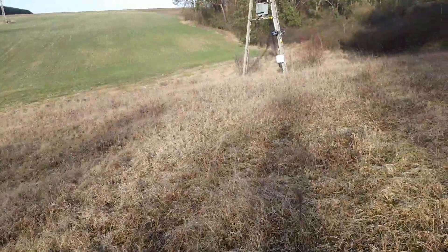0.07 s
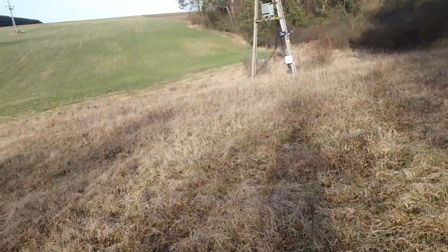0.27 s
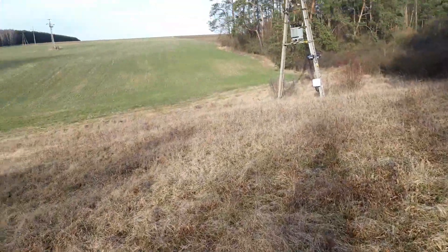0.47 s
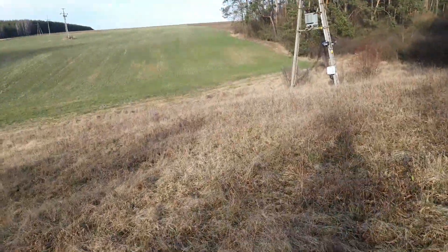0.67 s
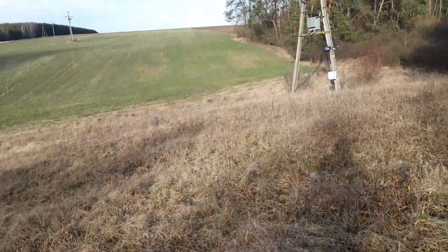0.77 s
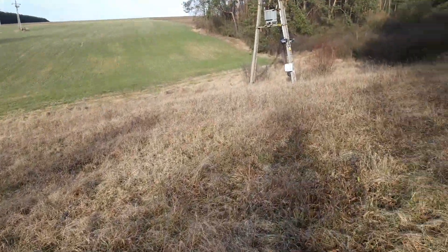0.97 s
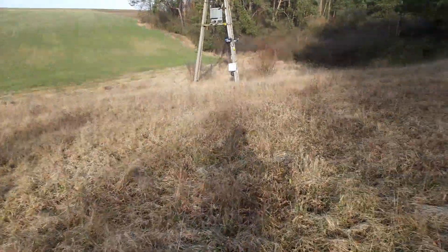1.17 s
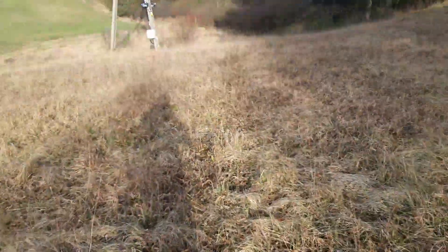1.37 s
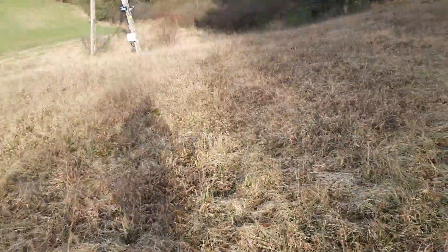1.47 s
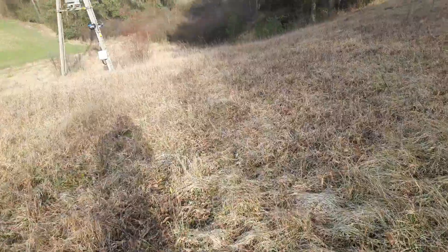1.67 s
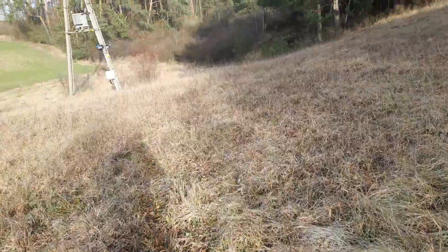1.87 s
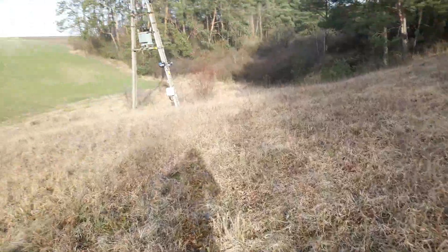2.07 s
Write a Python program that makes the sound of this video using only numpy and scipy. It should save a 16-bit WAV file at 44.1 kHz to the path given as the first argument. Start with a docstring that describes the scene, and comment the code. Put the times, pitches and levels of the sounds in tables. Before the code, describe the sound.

Quick footsteps rustle through tall dry grass while gusty wind rumbles and pops on the microphone

```python
"""Quick steps through tall dry grass in an open meadow, heard from a hand-held microphone.
From the start gusts rumble and flutter on the microphone as turbulence, with sharp pops from single eddies,
over faint air noise. Legs sweep the blades and feet crush the straw in swells of tiny random clicks.
A few stems snap as decaying noise bursts. The wind eases, the crushing grows, and a foot drags at the end."""
import sys
import numpy as np
from scipy import signal
from scipy.fft import rfft, irfft
from scipy.io import wavfile
from scipy.ndimage import uniform_filter1d, map_coordinates

SR = 44100
rng = np.random.default_rng(int(sys.argv[2]) if len(sys.argv) > 2 else 0)


def master(y):
    """Save y as 16-bit WAV."""
    cut = np.clip(np.atleast_2d(y).T, -1, 1)
    pcm = np.round(cut * 32767)  # scale
    wavfile.write(sys.argv[1], SR, pcm.astype(np.int16))


N = 93447

# dry straw underfoot, crushed or scuffed: mean clicks per second, spread of their strength in dB
STRAW_PER_S, STRAW_SPREAD_DB = 9000, 2.5


def undb(db):
    """Amplitude ratio: 20 dB is a factor of ten."""
    return 10 ** (np.asarray(db) / 20)


def curve(rows):
    """Linear interpolation of rows (seconds, value), with corners rounded by a 5 ms moving mean."""
    seconds, values = np.array(rows).T
    joined = np.interp(np.arange(N) / SR, seconds, values)
    return uniform_filter1d(joined, int(0.005 * SR))


def unit(x):
    """Normalisation of the signal power: the rms becomes 1."""
    return x / np.sqrt(np.mean(x ** 2))


def colour(x, points):
    """Zero-phase spectral shaping by (Hz, dB) points, joined by straight lines over log frequency."""
    hz, db = np.array(points, float).T
    f = np.maximum(np.arange(len(x) // 2 + 1) * SR / len(x), 1)
    gain = undb(np.interp(np.log(f), np.log(hz), db))
    return irfft(rfft(x) * gain, len(x))


def walk(hz):
    """Low-passed Gaussian noise: a random course of rms 1 that changes about hz times a second."""
    lowpass = signal.butter(2, hz / 2, fs=SR, output="sos")
    return unit(signal.sosfilt(lowpass, rng.standard_normal(N)))


def even(x, seconds):
    """Division by the local rms: the short-term level stays near 1."""
    k = max(int(seconds * SR), 1)
    power = uniform_filter1d(uniform_filter1d(x ** 2, k), k)
    return x / np.sqrt(power + 1e-12)


def wind():
    """Turbulent pressure: large eddies rumble, fine ones flutter, and both darken as the gust slackens."""
    # Gusts. Each row: time in seconds, rumble level in dB, fine flutter level in dB, both before trim.
    gusts = np.array([(0.0, -10.5, -29.5), (0.025, -20.5, -21.5), (0.041, -21, -44), (0.08, -21, -37),
                      (0.122, -26.5, -43.5), (0.14, -21, -42), (0.202, -22, -34), (0.218, -27, -64),
                      (0.253, -16, -19), (0.291, -31, -69), (0.308, -19, -22), (0.369, -21.5, -41),
                      (0.4, -22, -28), (0.45, -29, -49), (0.489, -42, -56), (0.535, -31, -50),
                      (0.56, -16, -16), (0.58, -19.5, -70), (0.596, -16, -22.5), (0.631, -15, -26.5),
                      (0.68, -22, -29.5), (0.74, -19, -26.5), (0.8, -30, -50.5), (0.82, -24, -34),
                      (0.839, -35, -56), (0.88, -29, -44), (0.9, -37, -52), (0.95, -20, -27.5),
                      (1.002, -18, -39), (1.03, -27.5, -49.5), (1.043, -17.5, -25.5), (1.11, -31, -50),
                      (1.14, -45.5, -62), (1.18, -44, -50.5), (1.195, -22.5, -29.5), (1.24, -34, -50),
                      (1.291, -28, -45.5), (1.311, -26, -30.5), (1.356, -40, -54), (1.375, -28, -40),
                      (1.406, -35.5, -52), (1.439, -25, -35.5), (1.495, -36.5, -55), (1.549, -29, -43),
                      (1.576, -34, -45), (1.609, -27, -39), (1.708, -40.5, -51), (1.8, -47, -58),
                      (1.879, -39.5, -60), (2.015, -51.5, -58), (2.049, -33, -49.5), (2.12, -35.5, -44)], float)
    # Large eddies at the reference level. Each row: frequency in Hz, relative spectral level in dB.
    large_eddies = [(20, -73), (55, -14), (110, 2), (190, -1), (300, -5), (420, -24), (700, -56),
                    (2000, -95)]
    # Fine eddies at the reference level. Each row: frequency in Hz, relative spectral level in dB.
    fine_eddies = [(150, -20.5), (330, 1), (450, 6), (700, -6.5), (1000, -17), (1600, -33), (2800, -46),
                   (6000, -102)]
    rumble_trim_db, fine_trim_db, reference_db = 1, -1.5, -20
    large_law, fine_law = 0.22, 0.09  # the eddies' pitch goes with these powers of the pressure
    bass_cut_hz = 54.6  # of the microphone

    rumble_db = curve(gusts[:, [0, 1]])
    fine_db = curve(gusts[:, [0, 2]])
    force_db = rumble_db - reference_db
    # the large eddies' pitch rises no further above the reference level
    large_speed = undb(large_law * np.minimum(force_db, 0))
    fine_speed = undb(fine_law * force_db)
    rumble = eddies(large_eddies, rumble_db + rumble_trim_db, large_speed, seconds=0.028)
    fine = eddies(fine_eddies, fine_db + fine_trim_db, fine_speed, seconds=0.0054)
    bass_cut = signal.butter(2, bass_cut_hz, "high", fs=SR, output="sos")
    return signal.sosfilt(bass_cut, rumble + fine + pops())


def eddies(spectrum, level_db, speed, seconds):
    """Frozen turbulence carried past the microphone port: the faster it goes, the higher it sounds."""
    flutter_hz, flutter_db, flutter_speed = 196, 2.5, 0.17  # rate, level spread, log-speed spread
    frozen = unit(colour(rng.standard_normal(2 * N), spectrum))
    flutter = walk(flutter_hz)
    place = np.cumsum(speed * np.exp(flutter_speed * flutter))  # in samples of the frozen pattern
    flow = map_coordinates(frozen, [place], mode="mirror") * undb(flutter_db * flutter)
    return even(flow, seconds) * undb(level_db)


def pops():
    """Vortex suction at the port: a sharp lopsided dip with soft flanks, higher for a smaller core."""
    # Single strong eddies. Each row: time in seconds, strength in dB, frequency of the core's peak in Hz.
    vortices = [(.011, -6, 133), (.0249, -3, 523), (0.0261, -2.5, 235), (0.1643, -15.5, 326),
                (.1885, -19, 340), (0.1989, -9, 295), (0.2445, -4, 488), (.252, -9, 55),
                (0.257, -16.5, 230), (0.3133, -7, 135), (0.3147, -13, 366), (.333, -23, 450),
                (.397, -12, 235.5), (0.5475, -12, 356), (0.5561, -13, 115), (0.5635, -6.5, 201),
                (0.5943, -8, 305), (0.6078, -16, 340), (0.6237, -4.5, 126), (0.6291, -7.5, 278),
                (.64, -10.5, 161), (0.658, -13.5, 310), (0.7092, -14, 346), (0.7301, -6.5, 179),
                (0.7348, -9, 293), (0.8218, -12.5, 180), (0.9199, -13, 217), (.951, -10, 258),
                (0.9675, -14.5, 172), (0.9866, -12.5, 115), (1.038, -8.5, 294), (1.0566, -18, 256),
                (1.0758, -10.5, 170), (1.1939, -15, 151.6), (1.2078, -17, 177), (1.2628, -19.5, 218.6),
                (1.306, -22, 271.3), (1.3762, -16.5, 123), (1.426, -17, 157.8), (1.441, -14, 229),
                (1.5196, -13.5, 126.9), (1.5933, -17.5, 119), (1.6088, -13, 190), (1.6895, -22, 120),
                (1.8105, -24, 104), (2.0313, -14, 101.4), (2.06, -19.5, 163)]
    lean = 0.71  # how far the dip leans, one flank being sharper than the other
    rough, rough_hz = 0.067, 1170  # small whirls that ride on a strong eddy: share, rate
    out = np.zeros(N)
    for at, db, hz in vortices:
        u = np.pi * hz * (np.arange(N) / SR - at)
        core = (1 + 1j * u) ** -3
        out -= undb(db) * (core.real + lean * core.imag)
    return out * (1 + rough * walk(rough_hz))


def meadow_air():
    """Stationary coloured noise: distant air over the meadow."""
    # Air noise. Each row: frequency in Hz, relative spectral level in dB.
    air_colour = [(30, -7), (110, 4), (300, -68), (600, -12.5), (1200, -16), (2500, -24), (16000, -52)]
    return undb(-48.5) * unit(colour(rng.standard_normal(N), air_colour))


def rustle(levels, spectrum, per_s, spread_db, patchy_db, patchy_hz):
    """Random impulse train: thousands of tiny dry clicks, mostly weak, that come in tufts."""
    hit = rng.random(N) < per_s / SR
    sign = rng.choice([-1, 1], N)
    strength = undb(spread_db * np.minimum(rng.exponential(size=N), 6))
    clicks = even(colour(hit * sign * strength, spectrum), seconds=0.054)
    return clicks * undb(curve(levels) + patchy_db * walk(patchy_hz))


def crush():
    """Summed brittle fractures: straw crushed under the feet."""
    # Swells of crushing. Each row: time in seconds, level in dB before trim.
    swells = [(0.02, -58), (0.09, -60.5), (0.33, -60.5), (0.47, -51.5), (0.62, -58), (1.0, -51.5),
              (1.04, -49), (1.08, -54), (1.19, -47.5), (1.22, -52), (1.36, -55), (1.44, -55), (1.55, -57),
              (1.68, -46.5), (1.7, -49.5), (1.75, -51.5), (1.87, -43.5), (1.88, -36.5), (1.91, -45.5),
              (1.97, -44.5), (2.11, -54.5), (2.12, -47)]
    # Sound of crushed straw. Each row: frequency in Hz, relative spectral level in dB.
    straw_colour = [(300, -3), (1000, -5.5), (1600, -4), (2700, -0.5), (3500, 4), (4800, 1.5), (6500, 4.5),
                    (8000, 4), (10500, -4.5), (16000, -6)]
    clicks = rustle(swells, straw_colour, STRAW_PER_S, STRAW_SPREAD_DB, patchy_db=1.28, patchy_hz=88)
    return undb(0.5) * clicks  # trim


def sweep():
    """Summed friction impulses: blades sweeping along the legs."""
    # Swells of sweeping. Each row: time in seconds, level in dB before trim.
    swells = [(0.02, -51), (0.13, -65.5), (0.15, -52), (0.21, -81.5), (0.22, -58), (0.35, -77), (0.39, -54),
              (0.45, -59), (0.46, -50), (0.58, -67), (0.62, -59.5), (0.74, -66.5), (0.81, -48),
              (1.11, -61.5), (1.18, -56), (1.23, -77), (1.43, -62), (1.45, -48), (1.46, -56.5), (1.52, -55),
              (1.63, -46), (1.81, -58), (1.89, -51.5), (1.91, -70), (1.97, -60), (2.08, -63), (2.12, -56)]
    # Sound of the blades. Each row: frequency in Hz, relative spectral level in dB.
    blade_colour = [(1000, 6), (3000, -2), (6000, -3), (8000, 8.5), (10500, 0.5), (12000, 6), (14000, 0),
                    (15700, 8)]
    clicks = rustle(swells, blade_colour, per_s=7700, spread_db=3.0, patchy_db=1.44, patchy_hz=120)
    return undb(4) * clicks  # trim


def snaps():
    """Sudden fracture: each stem gives a short decaying noise burst, thick stalks low, thin blades bright."""
    # Breaking stems. Each row: start in seconds, peak in dB before the microphone's response, pitch in Hz.
    stems = [(0.4167, -33.5, 7840), (0.5238, -37, 8950), (0.591, -37.5, 10230), (0.622, -28, 1800),
             (0.63, -32, 1610), (.8091, -33.5, 9150), (.952, -38, 1690), (1.165, -32.5, 8000),
             (1.4435, -34, 9900), (1.449, -22.5, 12500), (1.8853, -28, 8400), (1.9654, -30.5, 5730)]
    low_slope_db, high_slope_db = -9.5, -23  # dB per octave below and above the pitch
    decay_s = 0.0008
    out = np.zeros(N)
    for at, db, hz in stems:
        age = np.arange(N) / SR - at
        # the slopes run for two octaves each way, then level off
        stem_colour = [(hz / 4, 2 * low_slope_db), (hz, 0), (hz * 4, 2 * high_slope_db)]
        decay = (age >= 0) * np.exp(-np.abs(age) / decay_s)
        crack = colour(rng.standard_normal(N) * decay, stem_colour)
        out += undb(db) * crack / np.abs(crack).max()
    return out


def scuff():
    """Friction as dense impulses: a foot drags through low straw."""
    # The drag. Each row: time in seconds, level in dB.
    drag = [(2.05, -74.5), (2.09, -54.5), (2.12, -43.5)]
    # Sound of the low straw. Each row: frequency in Hz, relative spectral level in dB.
    drag_colour = [(500, -9), (1150, -1), (2400, -31)]
    return rustle(drag, drag_colour, STRAW_PER_S, STRAW_SPREAD_DB, patchy_db=0.5, patchy_hz=90)


def scene():
    """Superposition: wind on the microphone, the quiet meadow and the grass, on one channel."""
    grass = crush() + sweep() + snaps() + scuff()
    return (wind() + meadow_air() + grass)[None]


def record(dry):
    """Resonance and band limit: the microphone rings in the treble, the recorder cuts the top."""
    # Microphone and housing resonances. Each row: frequency in Hz, width in Hz, added level in dB.
    resonances = [(4850, 840, -3), (9240, 800, 6)]
    ring = 0
    for hz, width, db in resonances:
        b, a = signal.iirpeak(hz, hz / width, fs=SR)
        ring = ring + undb(db) * signal.lfilter(b, a, dry)
    top_cut = signal.ellip(12, 0.1, 90, 15750, fs=SR, output="sos")  # ripple dB, stopband dB, edge Hz
    return signal.sosfilt(top_cut, dry + ring)


dry = scene()
out = record(dry)
master(out)
```